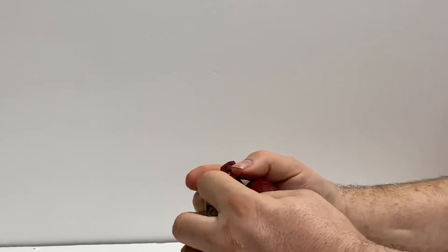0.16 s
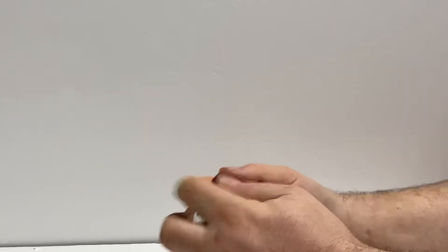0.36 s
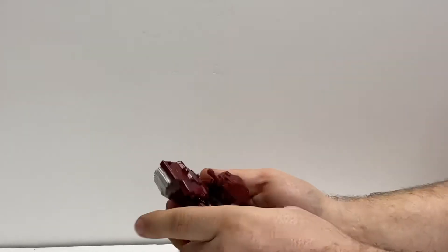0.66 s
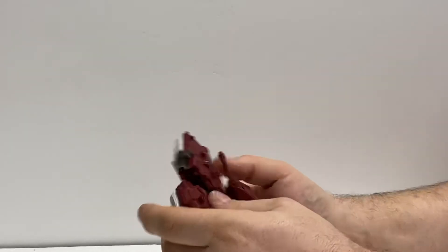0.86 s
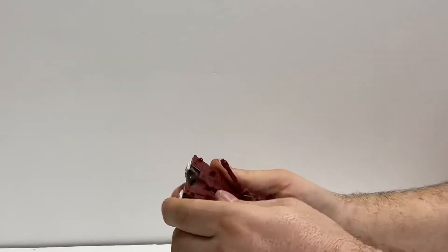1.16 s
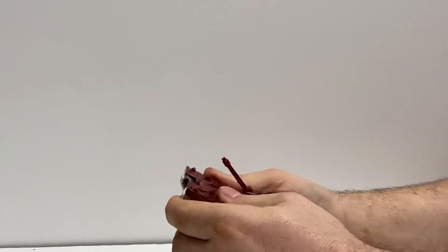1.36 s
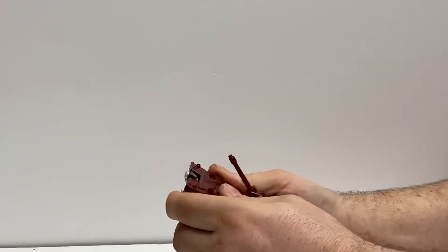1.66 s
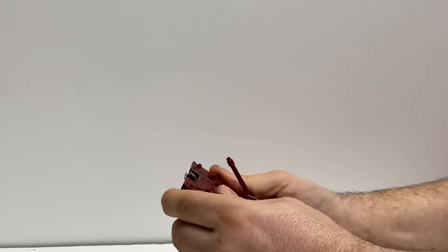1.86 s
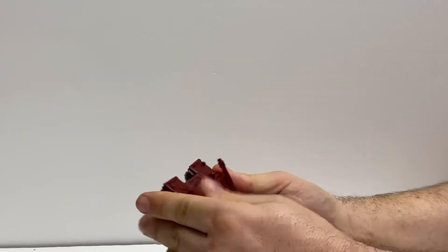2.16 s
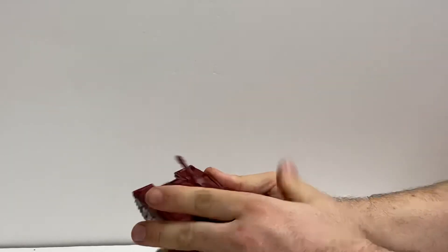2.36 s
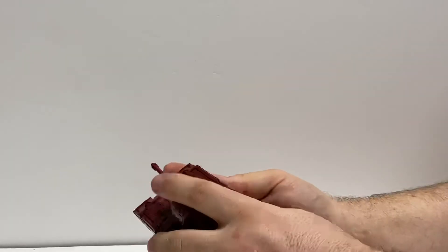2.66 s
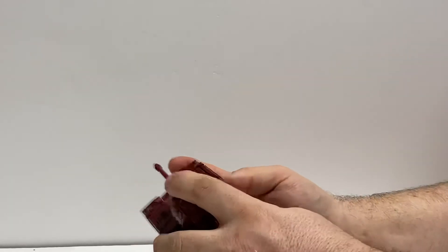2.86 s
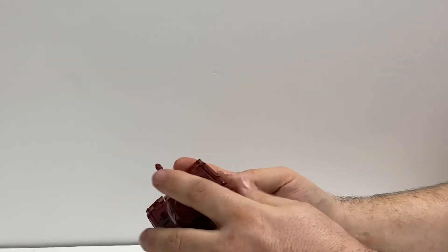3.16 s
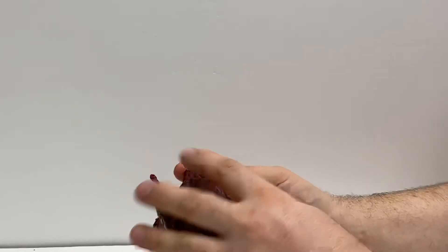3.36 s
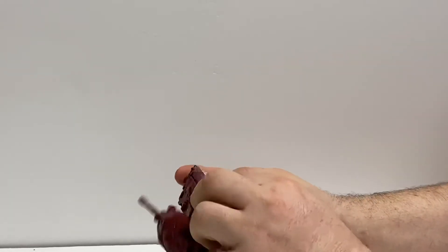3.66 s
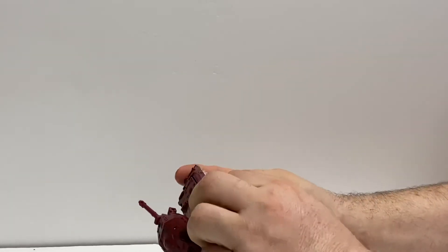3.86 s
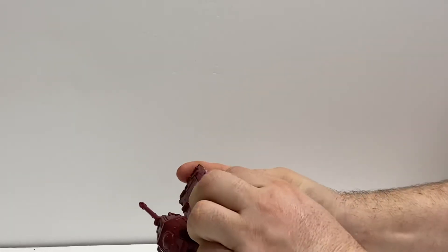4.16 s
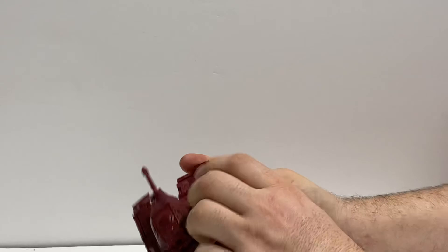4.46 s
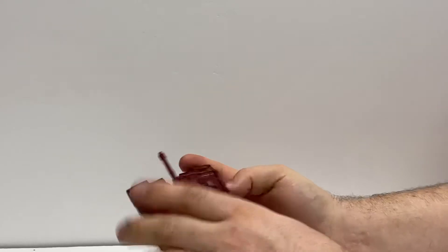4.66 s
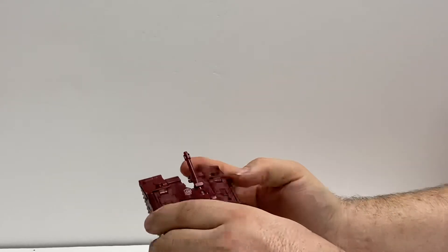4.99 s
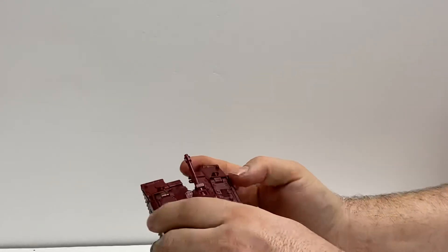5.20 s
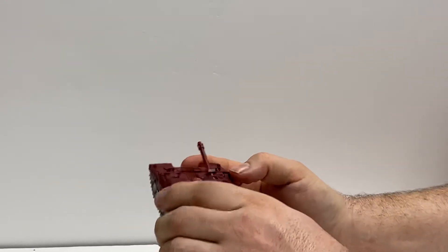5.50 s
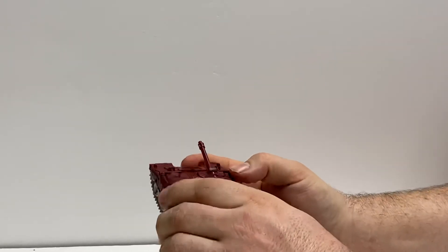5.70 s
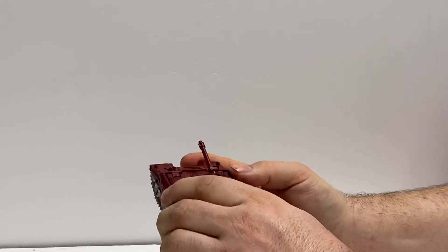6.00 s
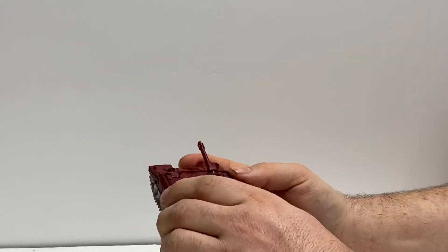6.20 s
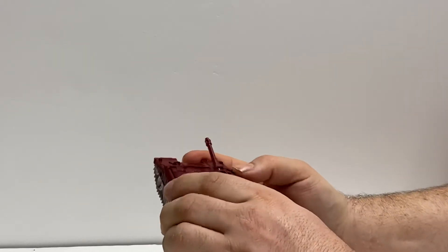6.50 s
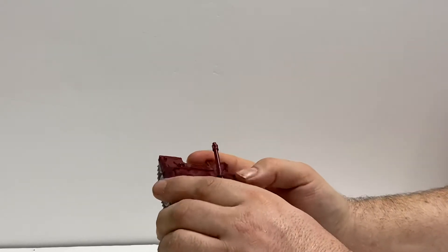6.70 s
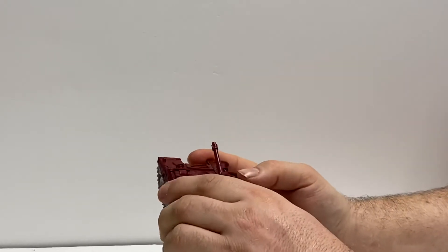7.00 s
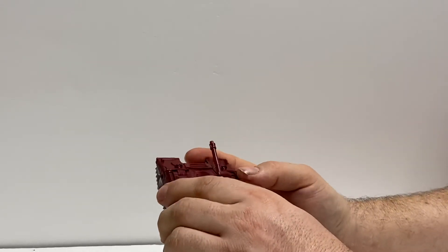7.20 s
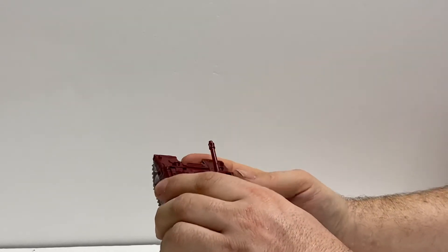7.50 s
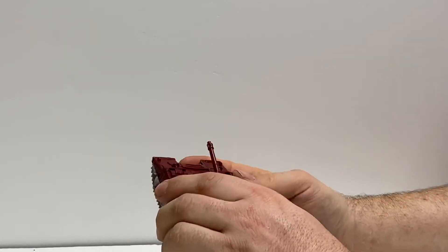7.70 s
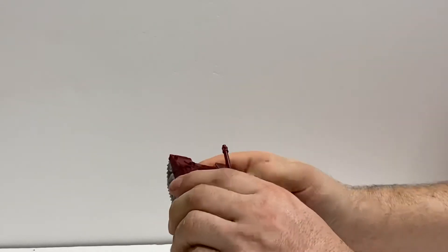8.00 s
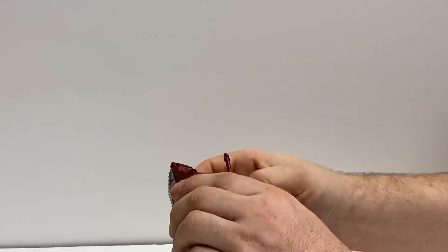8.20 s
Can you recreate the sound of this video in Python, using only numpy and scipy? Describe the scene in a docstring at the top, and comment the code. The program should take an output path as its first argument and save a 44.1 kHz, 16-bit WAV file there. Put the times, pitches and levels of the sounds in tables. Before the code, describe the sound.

A jointed hard plastic toy is handled close to a stereo microphone in a small quiet room. Fingers hiss and tick over it while panels click in uneven clusters, with short scrapes and tiny hinge squeaks. A bright snap comes just before three seconds, another just before six, each leaving a short ring. Then mostly soft grip rumble and near silence, with a faint rub and click at the end.

```python
"""A hard plastic toy is folded together by two hands, close to a microphone pair in a small quiet room.
Its hollow panels knock and its tabs snap home: short random forces excite the modes of the shell.
Stick-slip friction makes scrapes and squeaks, and locking tabs leave the hull ringing. Fingers hiss
and tick over the plastic, the grip rumbles softly, and faint air noise and mains hum lie underneath."""
import sys
import numpy as np
from scipy import signal
from scipy.fft import rfft, irfft, next_fast_len
from scipy.io import wavfile

SR = 44100
rng = np.random.default_rng(int(sys.argv[2]) if len(sys.argv) > 2 else 0)


def master(y):
    """Save y as 16-bit WAV."""
    cut = np.clip(np.atleast_2d(y).T, -1, 1)
    pcm = np.round(cut * 32767)  # scale
    wavfile.write(sys.argv[1], SR, pcm.astype(np.int16))


N = 368173  # length [samples]

# Parts meeting: (time [s], clack level [dB], knock, snap and crack re clack [dB],
#                 lower and upper ring of the struck part [Hz], ring re shell sound before band levelling [dB])
CLICKS = [(0.1186, -63, -13, -16, -14, 2950, 4600, -10), (.287, -49, -10.5, -2.5, -10, 2960, 3500, -5),
          (.569, -59.5, -16, -6, -5, 2880, 3680, -7), (0.64, -50, -33, -0.5, -4, 4250, 5600, 0.5),
          (0.725, -57.5, -32, 6, 1, 5600, 6860, -9), (.747, -56.5, -33, 0, -1, 3500, 4300, -9),
          (0.9924, -59.5, -3.5, -18, -26, 2860, 4560, 18), (1.0576, -59, 2, -20, -25, 2000, 2930, -11),
          (1.312, -64, -18, -14, -18, 2220, 2950, -9), (1.3979, -36.5, -8, -3, -9.5, 2950, 4540, 0.5),
          (1.4911, -39, -13, -5, -13, 2900, 4450, -5.5), (1.5028, -48, -5, -2, -15, 2920, 4600, -7),
          (1.6835, -58, -4, -21, -28, 2090, 2860, -11), (1.7227, -54.5, -6, -5.5, -12, 2880, 4400, -2),
          (1.796, -49.5, -9.5, -5, -19, 2840, 4540, -5), (1.8191, -64, 0, -13, -24, 3000, 4300, 3),
          (1.8403, -38, -17, -1, -18, 2850, 4100, 5), (1.841, -45, 3.5, -5, -15, 2010, 2890, 14),
          (2.449, -69, -27, 4.5, -3, 3360, 4500, 1), (2.602, -65.5, -23, -1, 1, 2950, 4240, -7),
          (2.8626, -30.5, -17, 8.5, 5.5, 4210, 4800, -5), (2.8641, -31.5, -24.5, 7.5, -1.5, 3550, 7470, -4),
          (3.25, -61, -2.5, -27, -8, 2290, 3130, -11), (3.607, -73, -7, 3, -2, 4000, 5800, -8),
          (3.643, -46, -8.5, 5.5, -5, 4600, 4830, 4), (3.648, -44.5, -8, 2.5, -7, 3370, 4600, 0.5),
          (4.022, -45, -5.5, -1.5, -17, 3390, 3380, -7.5),
          (4.0276, -41.5, -17.5, -4.5, -14, 3330, 4640, -4), (4.326, -69, -7.5, 5.5, -19, 3370, 4570, -8),
          (4.3923, -61.5, -2, 3, -9, 3400, 4500, -18), (4.7814, -59, 0.5, -4, -21, 3240, 4500, 17),
          (4.823, -66, 2, -7, -15, 2300, 3800, -7), (4.885, -52.5, -6.5, 8, 5.5, 5140, 5400, -6),
          (4.964, -60.5, 0.5, 0, -8, 1040, 4930, -4), (4.9969, -47, -6, 6, -5.5, 4970, 6180, -5),
          (5.3105, -61.5, 0.5, 2, -22, 2890, 5200, -2), (5.4681, -43, -0.5, -1.5, -11, 1850, 2900, 13),
          (5.4745, -42.5, -9.5, 4.5, 1, 1820, 4990, -1), (5.68, -61.5, -0.5, -13, -27, 950, 3640, -20),
          (5.723, -64.5, -2.5, -11.5, -28, 2020, 2810, -6.5), (5.775, -64, -2, 5, -1, 3900, 4600, -7.5),
          (5.7991, -59, -10, -10, -24, 2900, 3300, -2), (5.8077, -57.5, -12, 10.5, -13, 4620, 5330, -1),
          (5.8905, -29, -11.5, 1.5, -5, 3946, 4830, -1.5), (5.91, -40, -11, -0.5, -14, 3800, 4130, 9),
          (6.183, -70, -28.5, -14.5, -19, 2910, 3600, -3), (6.517, -75, -6.5, 0, 6.5, 2900, 5040, -2),
          (6.5713, -67.5, 6, 0, -7, 580, 6010, -3.5), (6.747, -71.5, -5, -13, -17.5, 2860, 3240, -3),
          (6.817, -78, 4, -19, -28, 1910, 2836, 1), (6.916, -68.5, 0.5, -3, -15, 2300, 4400, -11),
          (6.9247, -59.5, -3, 2, -13, 2850, 4380, -8), (8.004, -62, -8, 3, -4, 5300, 7400, -3),
          (8.008, -57.5, -4.5, 2, 0.5, 5120, 7300, -8), (8.0392, -54.5, -7, 2, -7, 2890, 5180, -6)]
# Borders of the knock, clack, snap and crack bands: (frequency [Hz])
CLICK_BANDS_HZ = [290, 2000, 4300, 8500, 17000]
# Nominal resonances of the toy's shell: (frequency [Hz], width [Hz], level [dB])
SHELL_MODES = [(446, 210, -9), (1086, 510, 1.5), (1980, 430, -14), (2850, 44, -4), (3580, 17, -3),
               (3840, 29, -4), (4640, 130, -8), (5240, 200, -3), (5647, 410, -5.5), (6030, 220, -4),
               (6680, 280, -16), (7820, 320, -11), (11540, 2000, -23), (14960, 1100, -17.5)]
# A panel pushed along its neighbour: (time [s], length [s], level [dB], resonance of that panel [Hz])
SCRAPES = [(0.266, 0.018, -55.5, 3500), (0.296, .05, -64, 3460), (0.562, 0.061, -55.5, 3400),
           (.735, 0.086, -62.5, 5460), (.805, .035, -59.5, 3480), (0.92, .035, -66, 3000),
           (2.018, .11, -67, 4600), (2.275, 0.12, -65.5, 3040), (2.558, 0.0089, -61.5, 3900),
           (2.597, 0.016, -68, 3100), (2.652, 0.089, -70, 3100), (2.788, 0.016, -73, 3100),
           (3.0, .03, -60, 2960), (3.14, 0.027, -68, 3000), (3.233, 0.06, -67.5, 2920),
           (3.306, 0.049, -59, 3070), (3.403, .06, -73, 3300), (3.47, 0.016, -57.5, 4020),
           (3.49, .008, -72, 3500), (3.877, 0.016, -62, 3470), (4.38, 0.033, -64, 5050),
           (4.778, 0.036, -65, 3300), (6.514, 0.11, -78, 5700), (6.672, 0.045, -72, 2900),
           (7.886, .06, -65.5, 5270), (7.989, .06, -65.5, 5300), (8.174, 0.048, -70.5, 3200),
           (8.274, 0.056, -75, 4500)]
# A stiff hinge rubs and one panel sings: (time [s], length [s], frequency [Hz], level [dB])
SQUEAKS = [(2.448, 0.024, 3430, -72), (3.878, 0.02, 3360, -59.5), (4.026, 0.08, 3400, -62),
           (7.893, 0.065, 5150, -69), (8.161, 0.064, 3160, -69.5)]
# A tab locks and sets the hull ringing: (time [s], level [dB], tilt [dB per octave])
LOCKS = [(2.864, -45, -1), (5.891, -46, -12)]
# Long modes of the hull: (frequency [Hz], level re lock before tilt [dB], t60 [s])
HULL_MODES = [(3450, -8, 0.15), (3572, -3, 0.25), (3773, -2.5, 0.18), (4000, -4, 0.18), (4064, -2, .2),
              (5400, -6.5, .17), (6024, -5.5, .16), (7428, -2, 0.17), (7610, -3.5, 0.13), (8150, -4.5, .17)]
# Light friction of the fingers, before the offsets of hiss and ticks: (time [s], level [dB])
SLIDING = [(0.0, -77.5), (.1, -86), (0.24, -82.5), (0.4, -79.5), (0.54, -83.5), (0.74, -81), (1.03, -83.5),
           (1.2, -87), (1.35, -81), (1.65, -83.5), (2.0, -83.5), (2.2, -84.5), (2.4, -91), (2.5, -94),
           (2.7, -92.5), (2.78, -94.5), (3.2, -93), (3.4, -75.5), (3.56, -81.5), (3.78, -82.5), (4.04, -81),
           (4.24, -91.5), (4.52, -83), (4.91, -81.5), (5.14, -101), (5.4, -88.5), (5.86, -91.5),
           (6.1, -110), (6.45, -108), (6.8, -101), (7.2, -97), (7.45, -86), (7.8, -86), (8.04, -91),
           (8.35, -87)]
# Spectrum of that friction, relative: (frequency [Hz], density [dB per Hz])
FRICTION_SPECTRUM = [(120, -8), (300, -7), (700, -8), (1400, -7.5), (2100, -3), (3100, -.5), (4300, -3),
                     (6000, -8), (8500, -18), (15000, -22)]
# Rumble of the shifting grip: (time [s], level [dB])
GRIP = [(0.0, -66.5), (.75, -69), (1.6, -66), (2.25, -76), (2.7, -70), (3.2, -76), (3.7, -66), (4.25, -70),
        (4.7, -67), (5.3, -70), (6.3, -84), (6.7, -72), (7.25, -72), (7.75, -66.5), (8.35, -70)]
# Spectrum of that rumble, relative: (frequency [Hz], density [dB per Hz])
GRIP_SPECTRUM = [(20, -28), (42, -7), (60, -4), (100, -10), (170, -15), (350, -24), (900, -50)]
# Jolts of the hands as a joint gives way: (time [s], envelope peak [dB])
JOLTS = [(0.574, -56.5), (1.508, -54), (2.508, -58.5), (2.872, -49.5), (3.551, -55.5), (5.389, -57),
         (5.901, -63.5), (6.573, -72), (7.971, -55)]
# Spectrum of the still air, relative: (frequency [Hz], density [dB per Hz])
AIR_SPECTRUM = [(15, -35), (25, -6), (70, 0), (160, -10), (430, -19), (860, -21), (1300, -27.5),
                (3500, -25.5), (6000, -32), (15000, -45)]
# Diffuse sound at the two microphone ports: (frequency [Hz], left-right likeness [0-1])
LIKENESS = [(30, 1), (60, 0.99), (125, 1), (250, 0.89), (1100, 0.66), (1800, 0.94), (4000, 1),
            (16000, 0.99)]
# Reverberation at the two ports: (frequency [Hz], left-right likeness [0-1])
ROOM_LIKENESS = [(100, 1), (500, 1), (1100, 0.18), (1900, 0.81), (4000, 1), (16000, 0.87)]
# Decay of the room: (frequency [Hz], t60 [s])
ROOM_T60 = [(200, .22), (1000, .17), (4000, .23), (8000, .22), (15000, .22)]
# Strength of the room: (frequency [Hz], reverberation re direct sound [dB])
ROOM_LEVEL = [(200, 0), (600, 0), (1100, 0), (1600, -6), (2100, -10.5), (3000, -7), (3700, -4.5),
              (4700, -9.5), (6000, -8.5), (7600, -6.5), (15000, -6.5)]
# Phase by which the left port lags: (frequency [Hz], lag [turns])
PORT_LAG = [(7400, 0), (8200, .27), (8400, .46), (9600, .58), (10700, 1), (11500, 1.05), (13000, 1.46),
            (13600, 1.55), (14900, 2)]

AIR_DB = -73
HUM_HZ, HUM_DB = 60.6, -79.5
JOLT_HZ = 74
SCRAPE_ATTACK_S, SCRAPE_RELEASE_S = .006, .011
CUTOFF_HZ = 16200


def from_db(db):
    """A level in decibels is twenty times the logarithm of the amplitude gain."""
    return 10 ** (np.asarray(db) / 20)


def rms_one(x):
    """Dividing by the root mean square gives unit power."""
    return x / np.sqrt(np.mean(x ** 2) + 1e-20)


def in_time(rows):
    """Linear interpolation gives a curve its value at every sample."""
    return np.interp(np.arange(N) / SR, *np.transpose(rows))


def at_hz(points, hz):
    """A spectrum is interpolated along a logarithmic frequency axis."""
    f, value = np.transpose(points)
    return np.interp(np.log(np.maximum(hz, 1)), np.log(f), value)


def band(x, low_hz, high_hz, order=2):
    """A Butterworth band-pass is maximally flat between its borders."""
    edges = [low_hz, min(high_hz, SR / 2 - 1000)]
    return signal.sosfilt(signal.butter(order, edges, "band", fs=SR, output="sos"), x)


def resonate(x, hz, width):
    """A pole pair near the unit circle is one damped resonance, here with gain 1 at its peak."""
    r = np.exp(-np.pi * width / SR)
    zeros = np.array([1, 0, -1]) * (1 - r * r) / 2
    poles = [1, -2 * r * np.cos(2 * np.pi * hz / SR), r * r]
    return signal.lfilter(zeros, poles, x)


def drift(per_s):
    """Lines drawn between random knots make a slow fluctuation of unit rms."""
    knots = rng.standard_normal(4000)
    return rms_one(np.interp(np.arange(N) / SR * per_s, np.arange(len(knots)), knots))


def diffuse(pair, spectrum, likeness):
    """Independent mid and side noises give a coloured diffuse pair of set coherence; overall rms 1."""
    size = next_fast_len(pair.shape[1])
    hz = np.fft.rfftfreq(size, 1 / SR)
    mid, side = rfft(pair, size) * from_db(at_hz(spectrum, hz))
    alike = np.clip(at_hz(likeness, hz), 0, 1)
    both = np.sqrt(1 + alike) * mid + np.sqrt(1 - alike) * side * np.array([[1], [-1]])
    return rms_one(irfft(both, size)[:, :pair.shape[1]])


def shell(force, strengths_db, stretch, direct_db):
    """Modal superposition: a force drives every shell mode and also sounds at the contact point."""
    modes = 0
    for k, (hz, width, db) in enumerate(SHELL_MODES):
        sign = (-1) ** k  # neighbouring modes move in opposite phase
        modes = modes + sign * from_db(db + strengths_db[k]) * resonate(force, hz * stretch, width)
    return modes + from_db(direct_db) * force


def background():
    """Diffuse broadband noise is the still air of the room; a single sine is the mains hum."""
    hum = from_db(HUM_DB) * np.sqrt(2) * np.sin(2 * np.pi * HUM_HZ * np.arange(N) / SR)
    return from_db(AIR_DB) * diffuse(rng.standard_normal((2, N)), AIR_SPECTRUM, LIKENESS) + hum


def hands(swell_s=.016):
    """Soft flesh is heavily damped: the grip rumbles, and each jolt swells and dies in a few slow cycles."""
    out = from_db(in_time(GRIP)) * diffuse(rng.standard_normal((2, N)), GRIP_SPECTRUM, LIKENESS)
    for s, db in JOLTS:
        t = np.maximum(np.arange(N) / SR - s, 0)
        swell = t / swell_s * np.exp(1 - np.minimum(t / swell_s, 50))  # peak 1
        out = out + from_db(db) * swell * np.sin(2 * np.pi * JOLT_HZ * t)
    return out


def sliding(hiss_db=13.5, ticks_db=8.5, ticks_per_s=320, size_db=4.5, uneven_db=3.0, fingers_db=2):
    """Friction of skin on plastic hisses unevenly; ridges catch at random and tick in the shell."""
    friction = from_db(in_time(SLIDING) + fingers_db)
    hiss = diffuse(rng.standard_normal((2, N)), FRICTION_SPECTRUM, LIKENESS)
    hiss = hiss * from_db(uneven_db * drift(60))

    sizes = from_db(size_db * np.minimum(rng.exponential(1, N), 3))
    catches = (rng.random(N) < ticks_per_s / SR) * sizes
    decay = np.exp(-1 / (.001 * SR))  # each catch dies with a 1 ms time constant
    skids = signal.lfilter([1], [1, -decay], catches + 1e-18) * rng.standard_normal(N)
    ticks = rms_one(shell(skids, np.zeros(len(SHELL_MODES)), 0.88, direct_db=-19.0))
    return from_db(hiss_db) * friction * hiss, from_db(ticks_db) * friction * ticks


def room(x, first_echo_s=.003):
    """Dense reflections from close walls decay exponentially, each band at its own rate."""
    t = np.arange(SR // 2) / SR
    hz = np.fft.rfftfreq(len(t), 1 / SR)
    noise = diffuse(rng.standard_normal((2, len(t))), [(20, 0), (20000, 0)], ROOM_LIKENESS)
    coloured = rfft(noise) * from_db(at_hz(ROOM_LEVEL, hz))
    edges, response = np.geomspace(150, 19000, 12), 0
    for low, high in zip(edges, edges[1:]):
        t60 = at_hz(ROOM_T60, np.sqrt(low * high))
        tail = from_db(-60 * t / t60) * (t > first_echo_s)
        noise_band = irfft(coloured * ((hz >= low) & (hz < high)), len(t))
        response = response + noise_band * tail / np.linalg.norm(tail)
    return signal.fftconvolve(x[None], response, axes=1)[:, :N]


def reverberation(rest, count=4):
    """Radiation is directional: differently coloured clicks leave the toy, and the walls mix them evenly."""
    return sum(room(clicks(aside_db=-5.5) + rest) for _ in range(count)) / np.sqrt(count)


def click(level_db, knock_db, snap_db, crack_db, lower_hz, upper_hz, ring_db, rise_s=.0006,
          contact_s=0.0031, ring_s=0.003, vary_db=5.5, chatter_db=-21, chatter_s=0.005):
    """Impact excitation: an edge skids over a catch and chatters to rest; shell and struck part ring."""
    t = np.arange(2048) / SR
    onset = np.minimum(t / rise_s, 1)
    skid = np.exp(-(t / contact_s) ** 2)
    chatter = from_db(chatter_db) * np.exp(-t / chatter_s)
    force = rng.choice([-1, 1], len(t)) * onset * (skid + chatter)

    strengths_db = vary_db * rng.standard_normal(len(SHELL_MODES))
    body = shell(force, strengths_db, 1 + 0.015 * rng.standard_normal(), direct_db=-6.0)
    tones = sum(np.sin(2 * np.pi * (hz * t + rng.random())) for hz in (lower_hz, upper_hz))
    ring = tones * onset * np.exp(-t / ring_s)
    sound = rms_one(body) + from_db(ring_db) * rms_one(ring)

    # soft contacts knock, hard ones crack
    out = 0
    for low, high, db in zip(CLICK_BANDS_HZ, CLICK_BANDS_HZ[1:], (knock_db, 0, snap_db, crack_db)):
        out = out + from_db(level_db + db) * rms_one(band(sound, low, high, order=5))
    return out * np.sqrt(0.0052 / t[-1])  # each level states the energy as if spread over 5.2 ms


def clicks(aside_db=0):
    """Impacts superpose, heard from one direction; aside_db alters the ring of the struck part."""
    out = np.zeros(N + SR)
    for s, *contact, ring_db in CLICKS:
        sound, start = click(*contact, ring_db + aside_db), int(s * SR)
        out[start:start + len(sound)] += sound
    return out[:N]


def stroke(size, length):
    """The gain of a rub: friction grips quickly, holds while the part travels, then dies away."""
    t = np.arange(size) / SR
    return np.clip(t / SCRAPE_ATTACK_S, 0, 1) * np.exp(-np.clip((t - length) / SCRAPE_RELEASE_S, 0, 50))


def scrapes(slips_per_s=900, size_db=2.5, slip_s=.0008, panel_width_hz=900, shell_db=-4, edge_db=-1,
            low_hz=1900, high_hz=8000, fizz_db=-6, uneven_db=2.0):
    """Stick-slip: an edge slips over fine ridges, exciting the rubbed panel and the shell behind it."""
    sizes = from_db(size_db * np.minimum(rng.exponential(1, N), 3))
    starts = (rng.random(N) < slips_per_s / SR) * sizes
    slips = signal.lfilter([1], [1, -np.exp(-1 / (slip_s * SR))], starts + 1e-18)
    slips = slips * rng.standard_normal(N) * from_db(uneven_db * drift(90))

    force = rms_one(band(slips, low_hz, high_hz, order=4))
    body = rms_one(shell(force, np.zeros(len(SHELL_MODES)), 0.95, direct_db=-20))
    fizz = rms_one(band(slips, high_hz, CUTOFF_HZ))
    common = from_db(shell_db) * body + from_db(edge_db) * force + from_db(fizz_db) * fizz

    out = np.zeros(N)
    for s, length, db, hz in SCRAPES:
        part = slice(int(s * SR), int(s * SR) + SR // 2)
        panel = rms_one(resonate(force[part], hz, panel_width_hz))
        rub = rms_one(common[part] + panel)
        out[part] += from_db(db) * stroke(len(rub), length) * rub
    return out


def squeaks(width_hz=140):
    """Sustained excitation: friction in a hinge, as noise, keeps one mode of its panel ringing."""
    out, size = np.zeros(N + SR), SR // 2
    for s, length, hz, db in SQUEAKS:
        start = int(s * SR)
        tone = rms_one(resonate(rng.standard_normal(size), hz, width_hz))
        out[start:start + size] += from_db(db) * stroke(size, length) * tone
    return out[:N]


def hull():
    """Free vibration: after a tab locks, each mode of the closed hull decays exponentially."""
    out, t = np.zeros(N + SR), np.arange(SR // 2) / SR
    for s, lock_db, tilt_db in LOCKS:
        start = int(s * SR)
        for hz, db, t60 in HULL_MODES:
            level_db = lock_db + db + tilt_db * np.log2(hz / HULL_MODES[0][0])
            decay = np.exp(-np.log(1000) * t / t60)
            tone = np.sin(2 * np.pi * (hz * t + rng.random()))
            out[start:start + len(t)] += from_db(level_db) * decay * tone
    return out[:N]


def scene():
    """Superposition: direct sound of the toy straight ahead, its reverberation, and the diffuse noises."""
    hiss, ticks = sliding()
    toy = ticks + scrapes() + hull()
    return clicks() + squeaks() + toy + reverberation(toy) + hiss + hands() + background()


def record(dry):
    """Phase lag: towards the top the left port falls behind the right; a steep low-pass cuts the rest."""
    size = next_fast_len(N + SR // 10)
    turns = np.interp(np.fft.rfftfreq(size, 1 / SR), *np.transpose(PORT_LAG))
    left = irfft(rfft(dry[0], size) * np.exp(-2j * np.pi * turns), size)[:N]
    low_pass = signal.ellip(10, .1, 80, CUTOFF_HZ, fs=SR, output="sos")
    return signal.sosfilt(low_pass, [left, dry[1]])


dry = scene()
out = record(dry)
master(out)
```